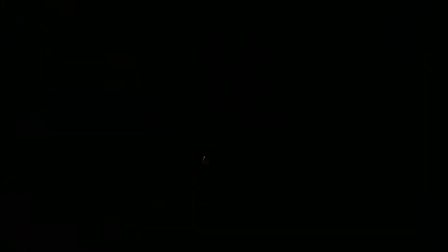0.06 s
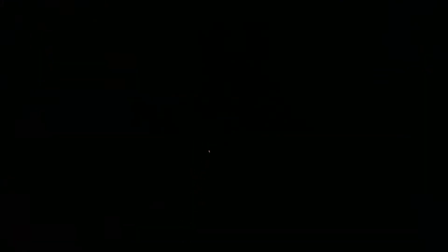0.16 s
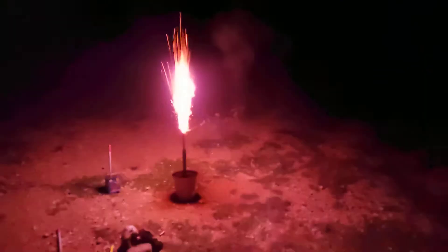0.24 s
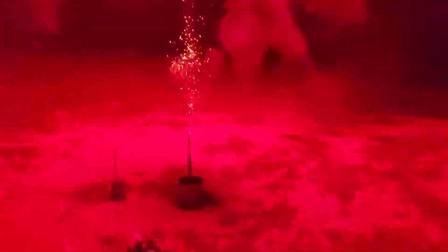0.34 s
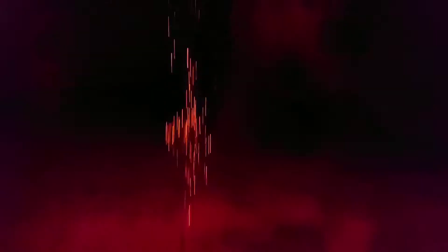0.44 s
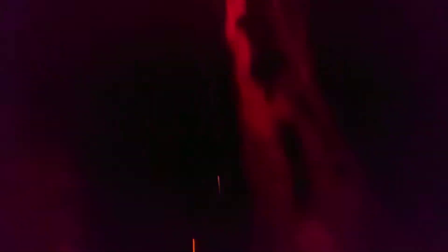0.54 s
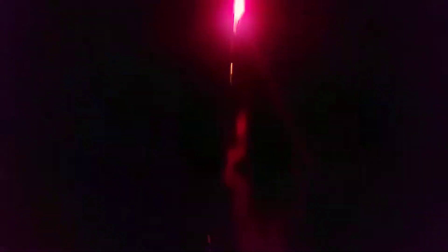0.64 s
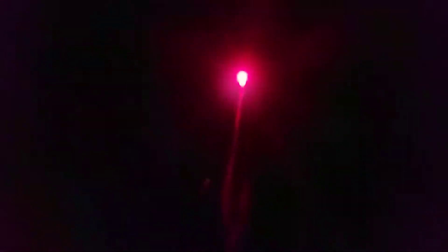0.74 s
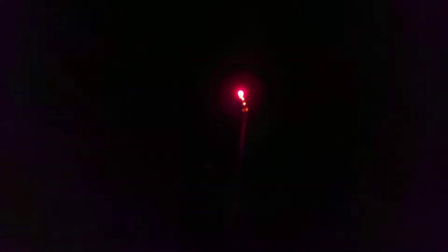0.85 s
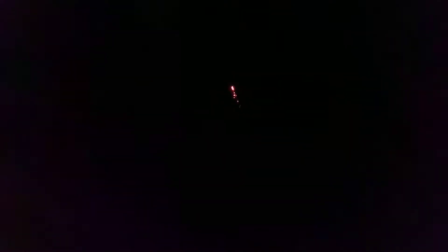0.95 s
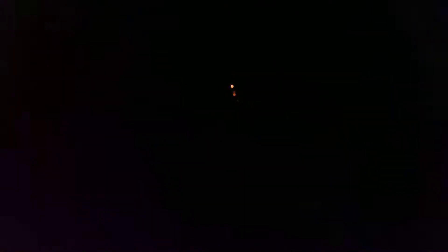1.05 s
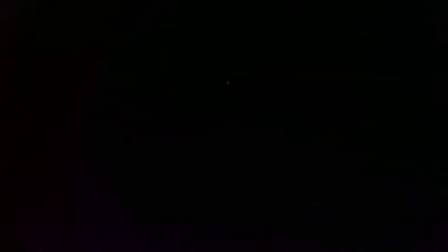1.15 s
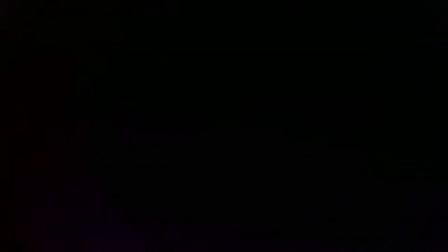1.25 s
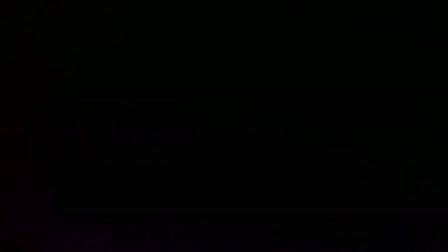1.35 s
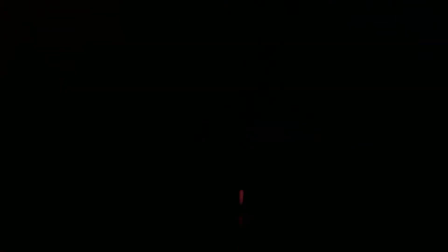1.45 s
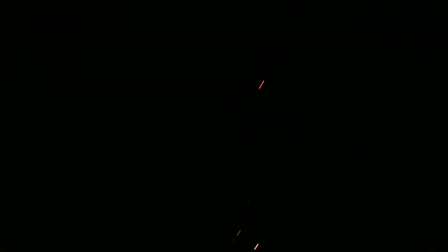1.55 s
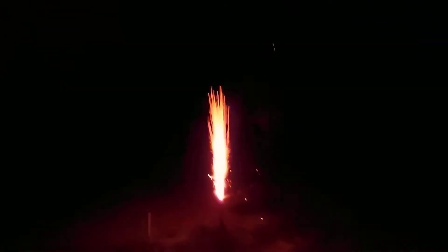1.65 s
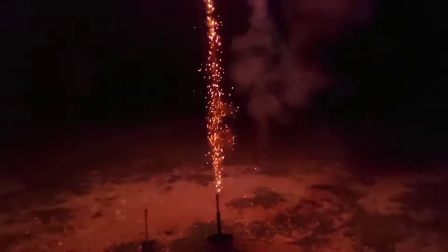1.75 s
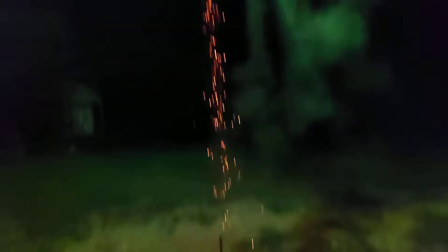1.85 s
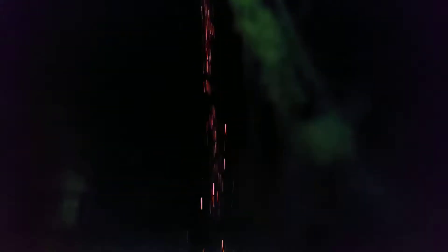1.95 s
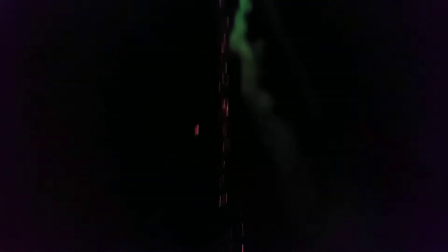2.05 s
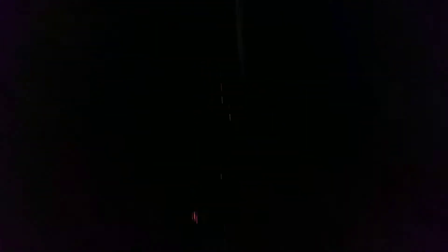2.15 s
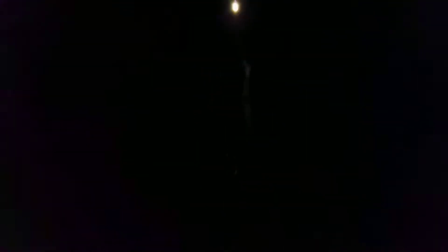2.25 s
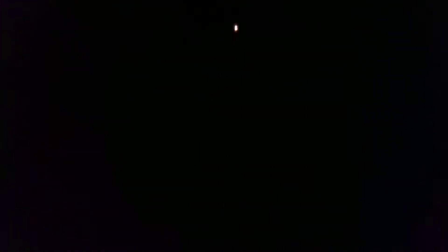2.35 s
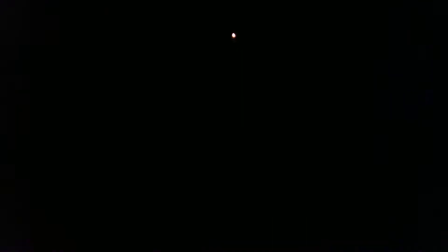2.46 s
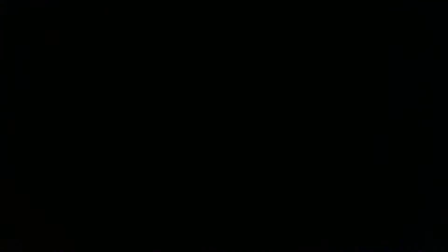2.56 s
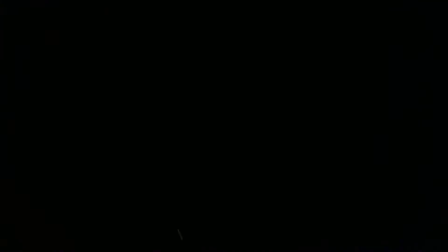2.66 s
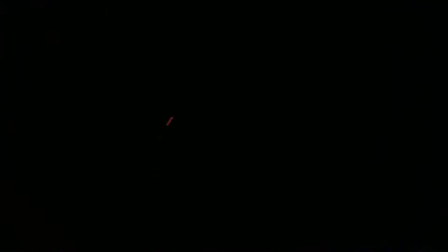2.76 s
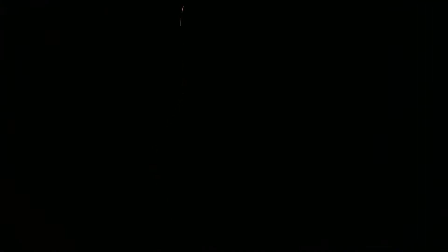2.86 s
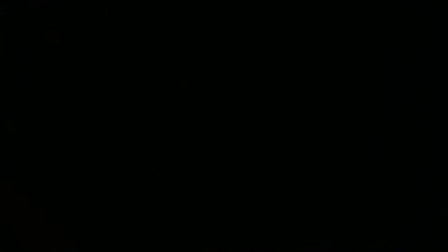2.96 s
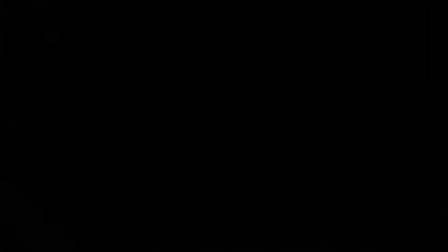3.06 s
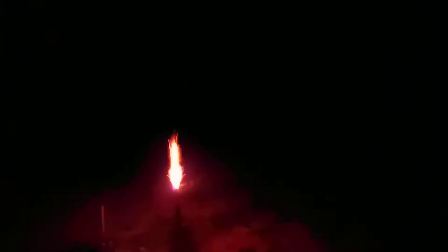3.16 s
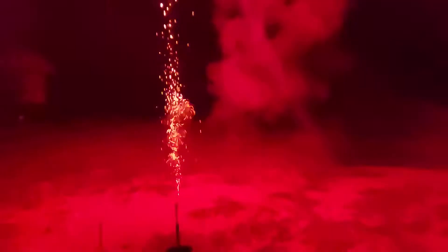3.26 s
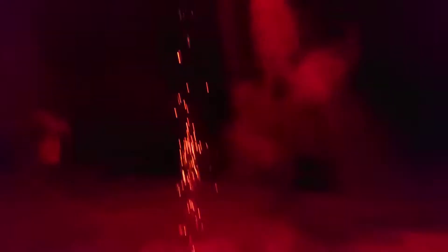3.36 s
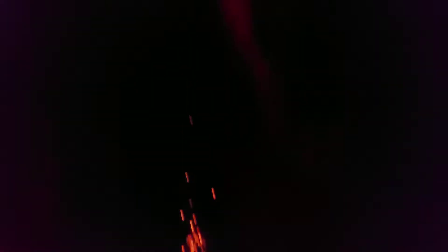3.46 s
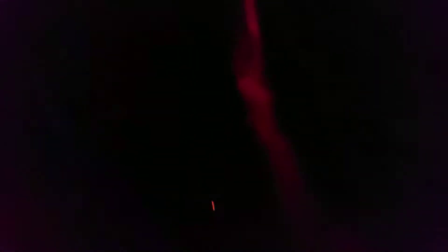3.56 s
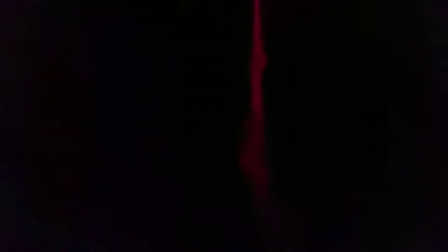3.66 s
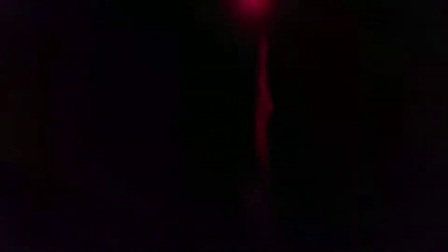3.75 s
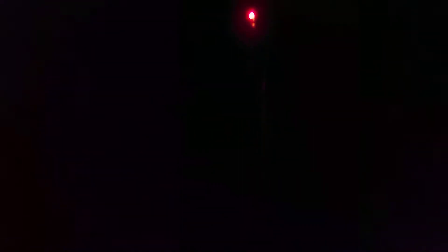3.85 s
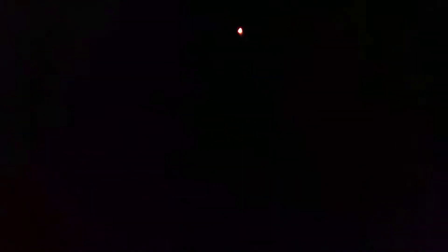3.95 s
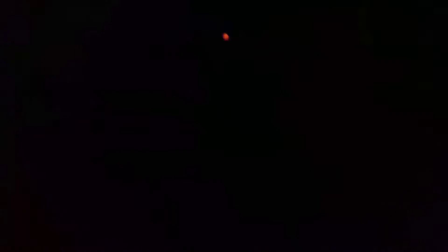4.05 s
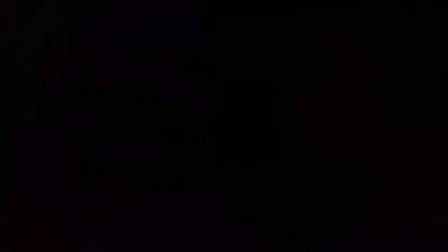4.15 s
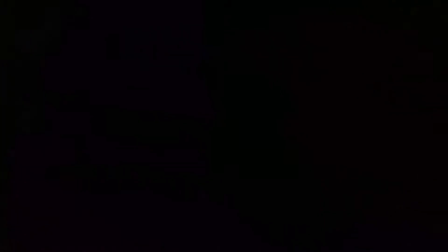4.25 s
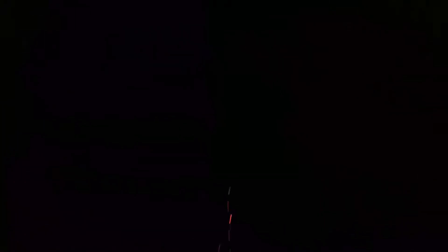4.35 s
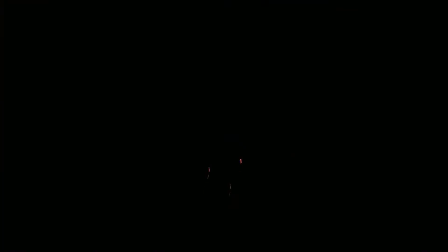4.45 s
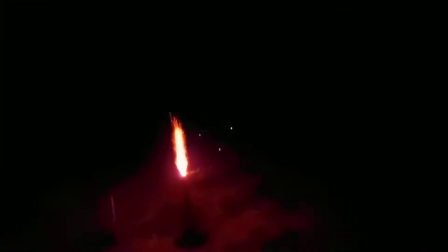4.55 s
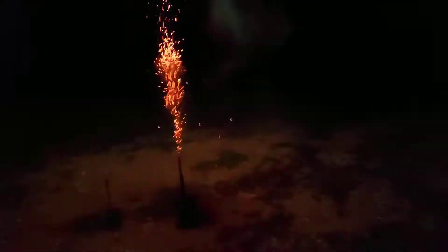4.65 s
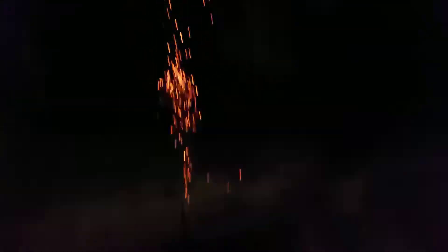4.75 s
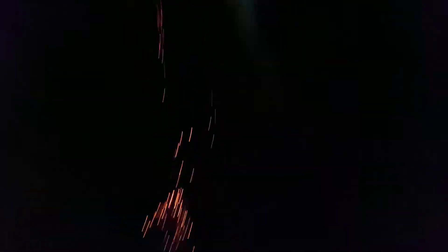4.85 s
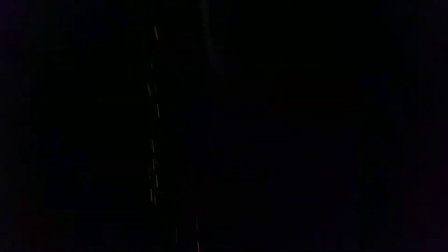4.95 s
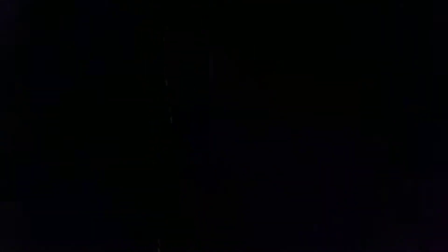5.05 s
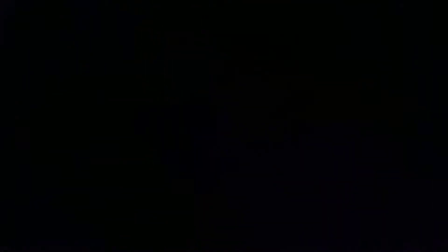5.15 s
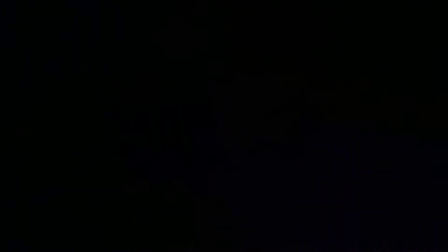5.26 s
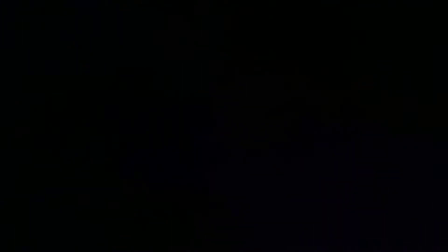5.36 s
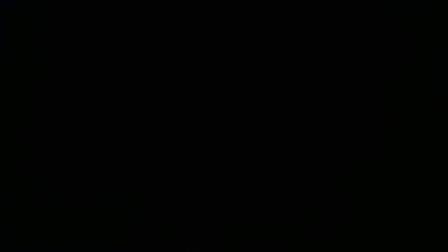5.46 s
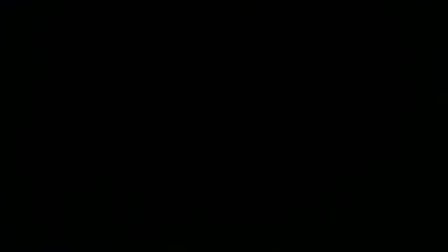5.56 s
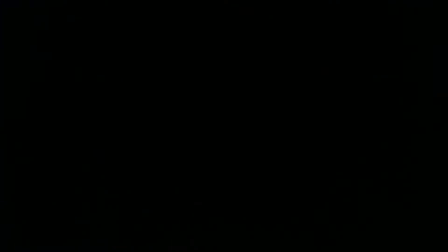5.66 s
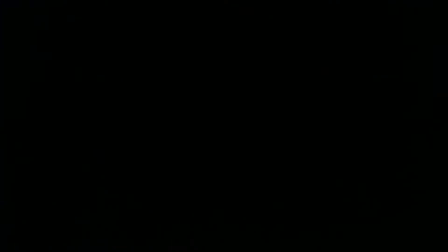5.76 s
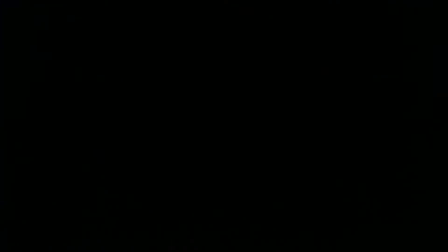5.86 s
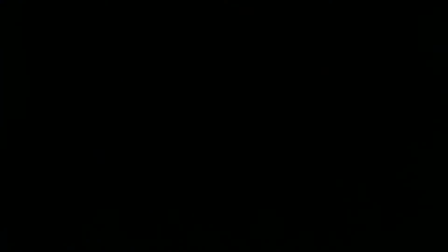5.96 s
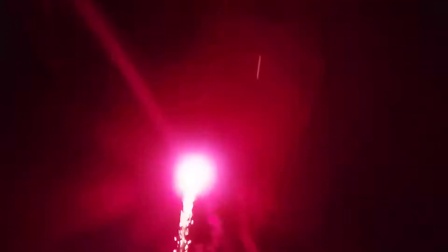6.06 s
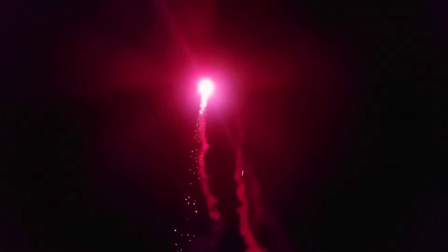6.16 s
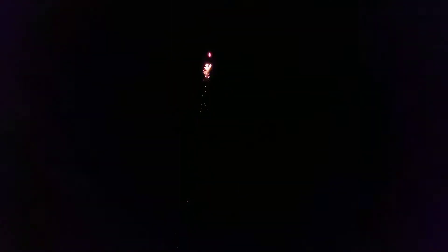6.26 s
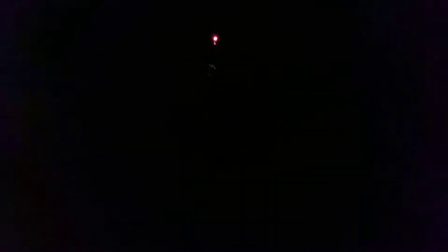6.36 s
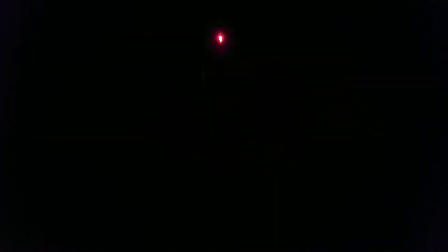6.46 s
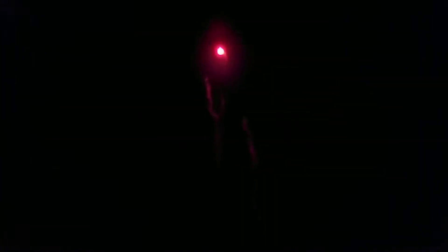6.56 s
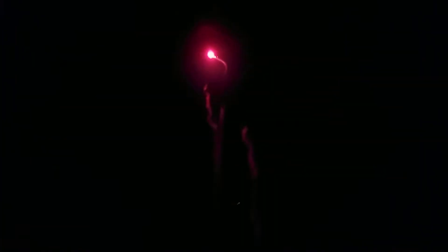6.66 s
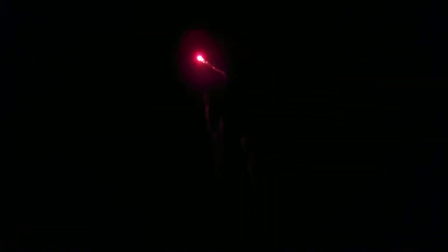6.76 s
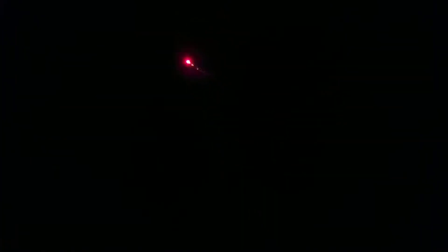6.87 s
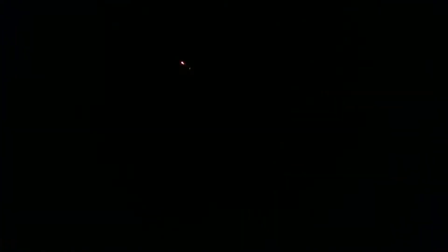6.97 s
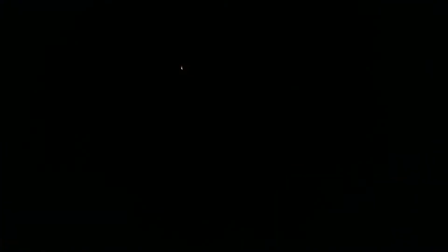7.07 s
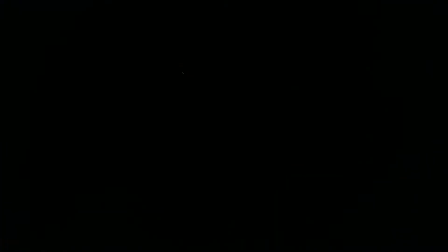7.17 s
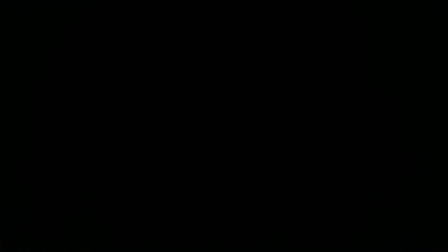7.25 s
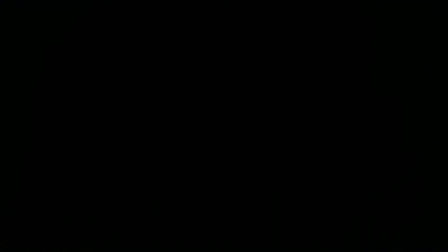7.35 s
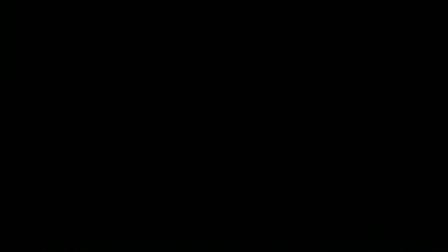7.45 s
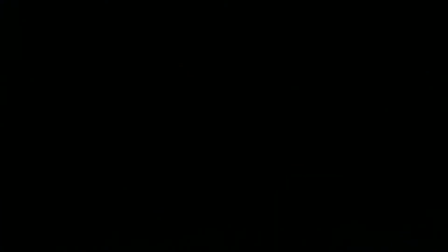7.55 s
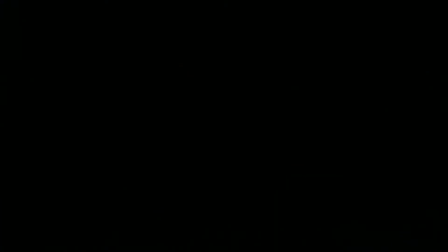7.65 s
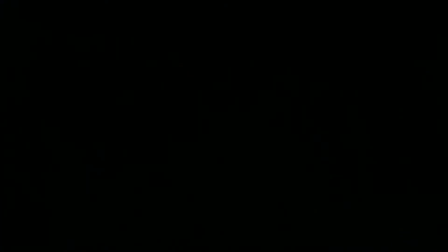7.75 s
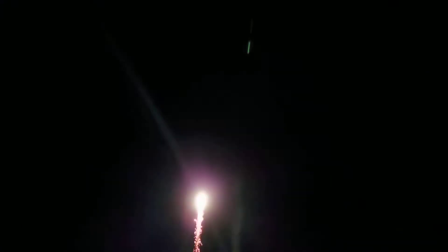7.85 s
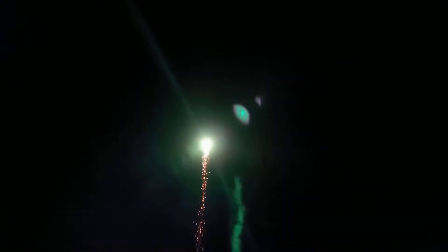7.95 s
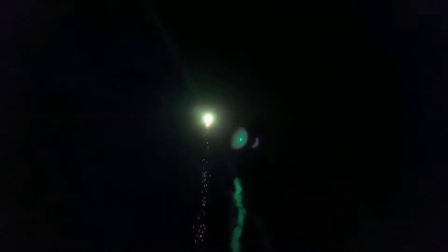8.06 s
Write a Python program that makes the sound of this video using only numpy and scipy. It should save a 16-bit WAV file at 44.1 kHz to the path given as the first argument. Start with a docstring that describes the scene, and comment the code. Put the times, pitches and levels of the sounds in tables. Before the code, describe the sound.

A firework candle fires six loud, sharp pops on open ground at night, at about 0.2, 1.6, 3.1, 4.5, 5.9 and 7.7 seconds. Each shot combines a crack, a brief rush of gas, a slightly hollow tube ring and a low thump. A short wash of reflections and a dull echo follow, then a faint fizz fades within a second as the star climbs away. The last shot is a little duller and fuller. Much quieter, crickets chirp all around from start to finish, the highest ones pulsing about three times a second over a steady trill. Distant tree frogs give faint pulsed calls, clearest near 0.5 seconds and weaker around 1.3, 4 and 6.6 seconds. Light puffs of wind buffet the microphone with brief low rumbles, mostly on the right, around 0.5, 1.4, 2.8 and 4.2 seconds.

```python
"""Roman candle at night

A cardboard tube on open ground fires six stars. Each shot is a turbulent gas jet, a crack as the star
clears the muzzle, a hollow tube resonance and a thump; the land scatters it back and the star hisses
away. Crickets stridulate all around, the highest kind in regular phrases; far tree frogs call in
pulses, and light puffs of wind buffet the microphone."""
import sys
import numpy as np
from scipy import signal
from scipy.fft import rfft, irfft, next_fast_len
from scipy.io import wavfile
from scipy.ndimage import map_coordinates

SR = 44100
rng = np.random.default_rng(int(sys.argv[2]) if len(sys.argv) > 2 else 0)


def digitize_waveform(pressure):
    """Quantize a signal to 16-bit integers and store it at the path in sys.argv[1].

    Rows of a 2-D input are taken as channels; values are limited to [-1, 1].
    """
    field = np.atleast_2d(pressure).T
    bounded = np.clip(field, -1, 1)
    quanta = np.round(bounded * 32767).astype(np.int16)
    wavfile.write(sys.argv[1], SR, quanta)


N = 357651
TIME = np.arange(N) / SR
PHRASE_PERIOD_S = .338   # beat of the high crickets


def candle(crack_db=-8, crack_ms=.044, thump_db=-15, scatter_db=-34, echo_db=-18, echo_s=.151,
           echo_hz=260, shade=.2, shade_hz=7000):
    """Superposition: each shot reaches the left port first, then returns as scatter and a dull echo."""
    # shots: t/s, jet level/dB, brightness/dB, time in tube/ms, roar decay/ms, ring level/dB,
    # round trip/ms, relative hiss level/dB, spark trail/s, burn time/s, left lead/samples
    shots = [(0.1797, -15, 2, 6.2, 11.6, -3, 1.8, -64, 0.48, 0.87, 2.5),
             (1.599, -11.5, -2, 6.43, 6.1, -1, 1.77, -62, 0.06, 0.91, 0.4),
             (3.1313, -15, -0.5, 5.8, 6.2, -14.5, 1.64, -67.5, 0.36, 0.76, 2.5),
             (4.5122, -13.3, -3, 6.9, 4.04, -10, 1.73, -66.8, 0.18, 0.7, 1.9),
             (5.9225, -11, -4, 7.7, 4.4, -2, 2.05, -66.5, 0.31, 1, 2),
             (7.6637, -7.5, -11, 6.76, 3.7, -10, 2.15, -68, 0.21, .6, 1.2)]
    out = np.zeros((2, N))
    samples = np.arange(SR + SR // 2)
    t = samples / SR
    ms = t * 1000
    for s, jet_db, bright_db, exit_ms, fall_ms, ring_db, trip_ms, hiss_db, trail_s, burn_s, lead in shots:
        pop = from_db(jet_db) * tube_comb(jet(ms, exit_ms, fall_ms, bright_db))
        pop += from_db(crack_db) * pulse(ms, exit_ms, crack_ms)
        pop += from_db(ring_db) * tube_ring(ms, exit_ms, trip_ms)
        pop += from_db(thump_db) * thump(ms, exit_ms)
        right = map_coordinates(pop, [samples - lead], order=3)
        right -= shade * cut(right, shade_hz, "high", order=1)   # acoustic shadow
        # short waves diffract round the microphone differently for each port
        side = from_db(jet_db - 8) * cut(jet(ms, exit_ms, fall_ms, bright_db), 3500, "high", order=1)
        add(out, np.array([pop + side, right - side]), s)
        echo = cut(cut(pop, echo_hz, "low", order=4), echo_hz / 4, "high")
        add(out, from_db(echo_db) * echo, s + echo_s)
        add(out, from_db(scatter_db) * scatter(t), s)
        add(out, from_db(hiss_db) * star(t, trail_s, burn_s), s)
    return out


def jet(ms, exit_ms, fall_ms, bright_db, rise_ms=.7, split_hz=3500, shock=.17):
    """Jet noise: turbulent gas roars past the star and decays once it is out, the hiss twice as fast."""
    # jet spectrum: f/Hz, spectral level/dB
    spectrum = [(40, -18.5), (120, -2), (260, 0), (450, -2), (850, -12), (1400, -4), (2000, -8),
                (2800, -3.5), (5000, -7.5), (10000, -8.5), (15500, -15)]
    gas = noise(spectrum, len(ms))
    gas = rms_one(gas + shock * cut(gas ** 2 - 1, 300, "high", order=1))   # compressions steepen
    roar = cut(gas, split_hz, "low", order=1)
    hiss = from_db(bright_db) * (gas - roar)
    decay = np.exp(-np.maximum(ms - exit_ms, 0) / fall_ms)
    return (1 - np.exp(-ms / rise_ms)) * decay * (roar + hiss * decay)


def tube_comb(x, round_trip_s=.0018, reflection=.3):
    """Comb filtering: repeated reflection from the tube's foot gives a slightly hollow colour."""
    loop = np.zeros(round(round_trip_s * SR) + 2)
    loop[0], loop[-3:] = 1, -reflection / 3
    return signal.lfilter([1], loop, x + 1e-18)


def tube_ring(ms, exit_ms, round_trip_ms, width_ms=.26, loss_db=10.5, low_hz=450):
    """Pipe resonance: a pulse in the empty tube returns once at full strength, then weaker and broader."""
    ring = pulse(ms, exit_ms, width_ms)
    for k in range(4):
        ring += from_db(-loss_db * k) * pulse(ms, exit_ms + (k + 1) * round_trip_ms,
                                              width_ms * np.sqrt(k + 1))
    return cut(ring, low_hz, "high", order=1)


def thump(ms, exit_ms, first_push=.916, late_ms=5.7, width_ms=2.2, swing_hz=54, q=1.2, low_hz=34):
    """Damped oscillation: gas pushes out ahead of the star and behind it; the pressure swings back."""
    push = first_push * pulse(ms, .77, width_ms / 2) + pulse(ms, exit_ms + late_ms, width_ms)
    w = 2 * np.pi * swing_hz / SR
    swing = signal.lfilter(*signal.bilinear([1, 0, 0], [1, w / q, w * w]), push + 1e-18)
    return cut(swing, low_hz, "high")


def scatter(t, build_s=.006, hold_s=.071, early_t60=1.9, clearing_s=.063, clearing_width_s=.0079,
            clearing_db=-5):
    """Scattering: rough ground, then plants beyond the clearing, return a wash that dies treble first."""
    # scattered spectrum: f/Hz, spectral level/dB
    spectrum = [(60, -0.5), (200, 1.5), (400, 1), (900, -3.5), (2500, -4.5), (5000, -6.5), (10000, -10),
                (15500, -7.5)]
    # reverberation times: f/Hz, T60/s
    decay_times = [(100, 1), (500, 0.47), (2000, 0.56), (6000, 0.45), (14000, 0.27)]
    wash = rfft(diffuse(spectrum, len(t)) * flicker(t, per_s=820, spread_db=1))
    hz = np.fft.rfftfreq(len(t), 1 / SR)
    centres, t60s = np.transpose(decay_times)
    out = 0
    for share, t60 in zip(np.eye(len(centres)), t60s):
        band = irfft(wash * at_hz(np.c_[centres, share], hz), len(t))
        decay_db = -60 * (np.minimum(t, hold_s) / early_t60 + np.maximum(t - hold_s, 0) / t60)
        out += band * flicker(t, per_s=55, spread_db=1.8) * from_db(decay_db)
    dip = from_db(clearing_db * pulse(t, clearing_s, clearing_width_s))
    return out * (1 - np.exp(-t / build_s)) * dip


def star(t, trail_s, burn_s, trail_db=6, recede_s=.4, light_s=.034):
    """Combustion noise: the star sheds sparks, then fizzes, fainter as it climbs, until it goes out."""
    # hiss spectrum: f/Hz, spectral level/dB
    spectrum = [(500, -2), (1500, -7), (3000, 4), (6000, 2), (9000, -4), (12500, 1.5), (15500, -4.5)]
    sparks = from_db(trail_db * (.5 - .5 * np.tanh((t - trail_s) / .025)))
    alight = np.minimum(t / light_s, 1) * (.5 - .5 * np.tanh((t - burn_s) / .07))
    sputter = flicker(t, per_s=6.7, spread_db=1.54) * flicker(t, per_s=150, spread_db=1.5)
    return 2 * diffuse(spectrum, len(t)) * sparks * alight * sputter / (1 + (t / recede_s) ** 2)


def wind(rise_s=.019, flutter_db=2, stir_db=-29, stir_s=.11):
    """Turbulent pressure: puffs buffet the right port; the left shares part of their eddies."""
    # puffs: peak t/s, right level/dB, decay time/s, left relative to right/dB
    puffs = [(.45, -35.5, .025, -2.5), (0.519, -29.5, .036, -20), (.71, -53.5, 0.026, 3),
             (0.939, -46, 0.051, 0.5), (1.447, -23.5, 0.014, -13), (1.53, -39, 0.065, -17.5),
             (1.889, -47.5, 0.037, -16), (2.69, -48, 0.014, -20.5), (2.774, -33, 0.032, -8),
             (2.85, -40.5, 0.046, -18), (3.36, -42.5, 0.038, -20.5), (3.66, -59, .04, -10),
             (4.214, -26.5, 0.024, -16), (4.29, -41.5, 0.036, 0.5), (4.4, -42, .08, -13),
             (4.761, -36, 0.02, -13.5), (4.86, -40.5, 0.033, -15.5), (6.7, -56, 0.043, -2)]
    # eddy spectrum: f/Hz, spectral level/dB
    spectrum = [(20, -23.5), (45, 0.5), (70, 2), (130, 1), (200, -10), (300, -21), (500, -40), (1000, -65),
                (3000, -85)]
    power = 0
    for s, level_db, decay_s, left_db in puffs:
        puff = np.exp(-np.maximum((s - TIME) / rise_s, (TIME - s) / decay_s))
        puff += from_db(stir_db) * pulse(TIME, s, stir_s)   # a wider stir of air
        power += (from_db([[level_db + left_db], [level_db]]) * puff) ** 2
    right = noise(spectrum, next_fast_len(N))[:N]
    left = (right + noise(spectrum, next_fast_len(N))[:N]) / np.sqrt(2)
    return np.sqrt(power) * flicker(TIME, per_s=30, spread_db=flutter_db) * np.array([left, right])


def crickets(skirt_db=-13, edge_db=-38, count=5):
    """Incoherent summation: a few near insects of each kind over a far crowd blurred into one band."""
    # kinds: f/Hz, spread of f/Hz, wing stroke rate/Hz, relative level/dB, far share of power
    kinds = [(2858, 81, 37, -.5, 0.8), (3488, 75, 56, -0.5, 0.6), (6378, 110, 34, -1, 0.7)]
    steady_db = chorus_level()
    levels_db = [steady_db, steady_db, phrase_level()]
    offsets = np.array([-16, -7, -3, -1, 1, 3, 7, 16])
    band_db = [2 * edge_db, edge_db, skirt_db, 0, 0, skirt_db, edge_db, 2 * edge_db]
    out = 0
    for (hz, spread, strokes, gain_db, far), level_db in zip(kinds, levels_db):
        near = sum(cricket(hz + spread * k, strokes * (1 + rng.normal() / 10))
                   for k in np.linspace(-1, 1, count))
        crowd = diffuse(np.c_[hz + spread * offsets, band_db], N)
        out += from_db(level_db + gain_db) * (np.sqrt(1 - far) * rms_one(near) + np.sqrt(far) * crowd)
    return out


def cricket(hz, strokes_per_s, sag=.058):
    """Stridulation: each wing stroke is a short tone sagging in pitch; bearing sets the stereo phase."""
    stroke_rate = strokes_per_s * (1 + drift(count=120) / 20)
    stroke = (np.cumsum(stroke_rate) / SR + rng.random()) % 1
    phase = 2 * np.pi * np.cumsum(hz * (1 + sag * (.5 - stroke))) / SR
    shift = rng.uniform(-np.pi / 2, np.pi / 2)
    envelope = (4 * stroke * (1 - stroke)) ** 2 * from_db(2 * drift(count=30))
    return envelope * np.sin([phase + shift, phase - shift])


def chorus_level(swell_db=1.4, peak_s=1.5, period_s=1.46):
    """Slow amplitude modulation: the level in dB of the low and middle crickets swells and ebbs."""
    # underlying course: t/s, level/dB
    course = [(0.0, -55), (0.54, -54.5), (4.67, -55.5), (5.22, -58.5), (8.11, -54.5)]
    return in_time(course) + swell_db * np.cos(2 * np.pi * (TIME - peak_s) / period_s)


def phrase_level(level_db=-58.8, pause_db=-7.5, attack_s=.11, release_s=.13, uneven_db=1.53):
    """Trapezoidal modulation: the level in dB of the high crickets rises, holds and sinks each phrase."""
    since = phrase_clock()
    effort = np.minimum(since / attack_s, (PHRASE_PERIOD_S - since) / release_s).clip(max=1)
    return level_db + pause_db * (1 - effort) + uneven_db * drift(count=24)


def phrase_clock(first_pause_s=.13):
    """Synchrony: the high crickets share one clock, the seconds since their phrase began."""
    # lead over the strict beat: t/s, lead/s
    hurry = [(1.2, .02), (2.2, -.02), (3.4, 0.061), (5.6, .07), (6.8, 0.014)]
    return (TIME + in_time(hurry) - first_pause_s) % PHRASE_PERIOD_S


def lead_cricket(hz=6530, level_db=-66.5, start_s=.025, note_s=.16, uneven_db=2):
    """Gated stridulation: the nearest cricket, straight ahead, trills almost purely in each phrase."""
    progress = np.clip((phrase_clock() - start_s) / note_s, 0, 1)
    note = np.sqrt(np.abs(np.sin(np.pi * progress)))
    trill = rms_one(cricket(hz, strokes_per_s=45, sag=.008)[0])
    return from_db(level_db + uneven_db * drift(count=24)) * note * trill


def frogs(pulses_per_s=46, upper_db=9, upper_ratio=1.83, rise=.14, blur=.4):
    """Two resonances sound in runs of pulses rising in pitch; distance blurs part into noise."""
    # calls: t/s, duration/s, level/dB and f/Hz of the lower resonance
    calls = [(.44, .26, -68, 1500), (1.26, .38, -76, 1350), (4.0, .5, -78, 1290), (5.62, .36, -83, 1480),
             (6.6, .4, -78, 1290)]
    out = np.zeros((2, N))
    for s, length_s, level_db, hz in calls:
        t = np.arange(int(length_s * SR)) / SR
        beat = (t * pulses_per_s) % 1
        call = 0
        for centre, db in ((hz, 0), (hz * upper_ratio, upper_db)):
            phase = 2 * np.pi * np.cumsum(centre + hz * rise * (beat - .5)) / SR
            pulses = rms_one(np.sin(np.pi * beat) ** 2 * np.sin(phase))
            band = [(centre - 600, -50), (centre - 100, 0), (centre + 100, 0), (centre + 600, -50)]
            call += from_db(db) * (np.sqrt(1 - blur) * pulses + np.sqrt(blur) * diffuse(band, len(t)))
        add(out, from_db(level_db) * np.sin(np.pi * t / length_s) * call, s)
    return out


def night_air(level_db=-67):
    """Ambient noise: the night air and its faintest insects form a diffuse field."""
    # ambient spectrum: f/Hz, spectral level/dB
    spectrum = [(25, -25.5), (60, -2), (120, 0), (200, -9), (350, -18), (700, -27), (1900, -28.5),
                (2500, -19.5), (3800, -16.5), (4500, -33), (5700, -16), (7400, -28.5), (8600, -25),
                (9700, -31.5), (16000, -35.5)]
    return from_db(level_db) * diffuse(spectrum, N)


def diffuse(spectrum, size):
    """Diffuse field: stereo noise, coherent in the bass and nearly incoherent in the treble."""
    # likeness of left and right: f/Hz, correlation coefficient
    correlation = [(100, .87), (290, 0.45), (640, 0.33), (1400, 0.23), (3100, -0.11), (7000, 0.28),
                   (15000, -0.00039)]
    padded = next_fast_len(size)
    hz = np.fft.rfftfreq(padded, 1 / SR)
    alike = at_hz(correlation, hz)
    mid, side = rfft(rng.standard_normal((2, padded))) * from_db(at_hz(spectrum, hz))
    channels = np.sqrt(1 + alike) * mid + np.sqrt(1 - alike) * side * [[1], [-1]]
    return rms_one(irfft(channels, padded)[:, :size])


def noise(spectrum, size):
    """Spectral shaping of white noise, rms 1."""
    gain = from_db(at_hz(spectrum, np.fft.rfftfreq(size, 1 / SR)))
    return rms_one(irfft(rfft(rng.standard_normal(size)) * gain, size))


def flicker(t, per_s, spread_db):
    """Random amplitude modulation: a gain with per_s turns a second."""
    steps = rng.standard_normal(len(t))
    return from_db(spread_db * np.interp(t * per_s, np.arange(len(t)), steps))


def drift(count):
    """Slow random fluctuation through count points over the scene, spread about 1."""
    return np.interp(TIME, np.linspace(0, TIME[-1], count), rng.standard_normal(count))


def pulse(t, centre, width):
    """Gaussian pulse of height 1."""
    return np.exp(-.5 * ((t - centre) / width) ** 2)


def cut(x, hz, kind, order=2):
    """Causal Butterworth filter."""
    return signal.sosfilt(signal.butter(order, hz, kind, fs=SR, output="sos"), x + 1e-18)


def from_db(db):
    """Level to amplitude ratio."""
    return 10 ** (np.asarray(db) / 20)


def rms_one(x):
    """Normalisation to unit rms."""
    return x / np.sqrt(np.mean(x ** 2) + 1e-30)


def in_time(rows):
    """Linear interpolation of (t/s, value) at every sample."""
    return np.interp(TIME, *np.transpose(rows))


def at_hz(points, hz):
    """Interpolation of (f/Hz, value) on a log-frequency axis."""
    f, value = np.transpose(points)
    return np.interp(np.log(np.maximum(hz, 1)), np.log(f), value)


def add(out, sound, s):
    """Superposition of a sound starting at time s."""
    i = round(s * SR)
    out[:, i:i + sound.shape[-1]] += sound[..., :N - i]


def scene():
    """Superposition of the candle and the sounds of the night."""
    return candle() + crickets() + lead_cricket() + wind() + night_air() + frogs()


def record(dry):
    """Hard clipping limits the highest peaks; a steep low-pass removes the top treble."""
    ceiling, cutoff_hz = .92, 15900
    low_pass = signal.ellip(12, .1, 80, cutoff_hz, fs=SR, output="sos")
    return signal.sosfilt(low_pass, np.clip(dry, -ceiling, ceiling))


dry = scene()
out = record(dry)
digitize_waveform(out)
```